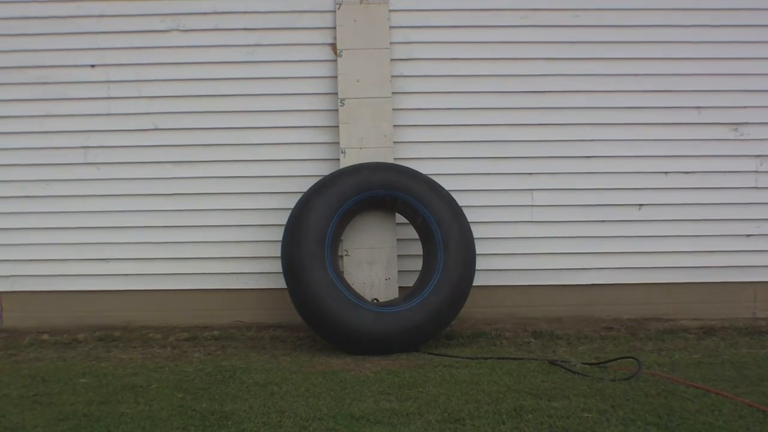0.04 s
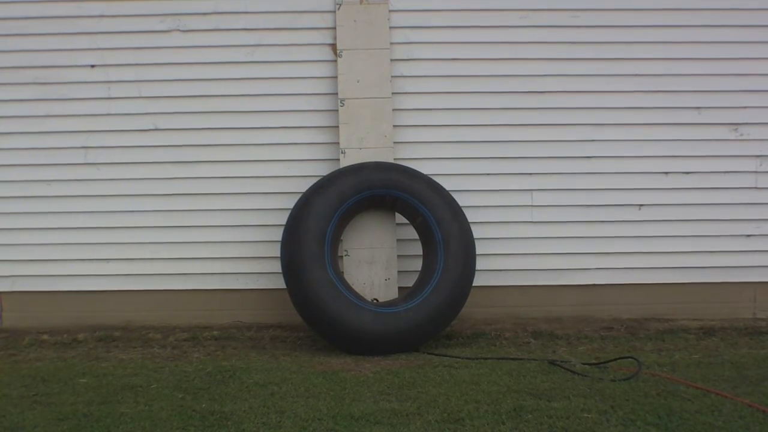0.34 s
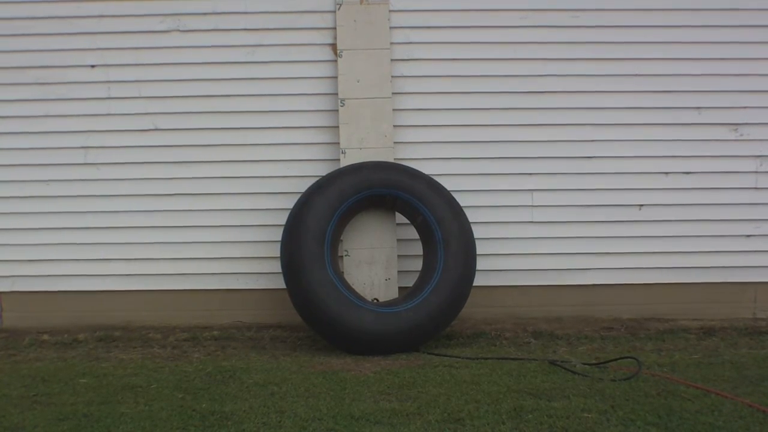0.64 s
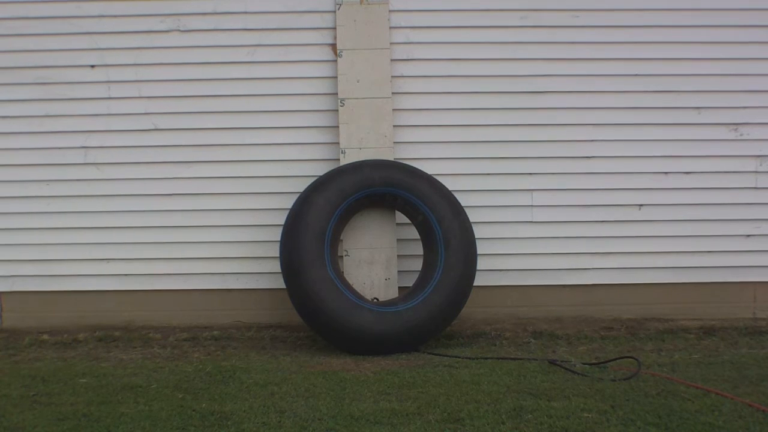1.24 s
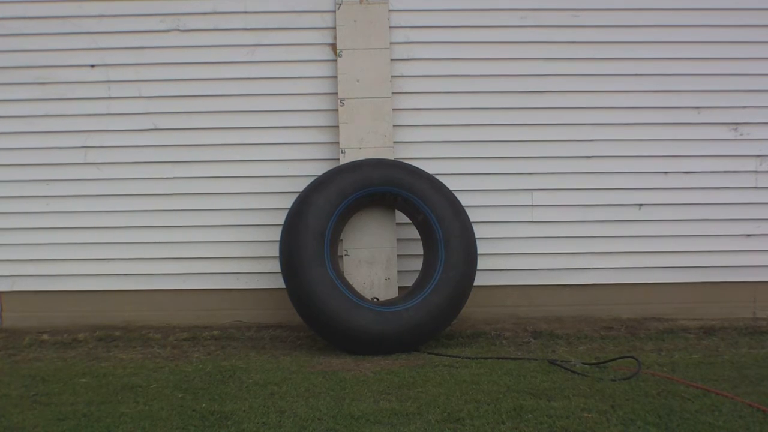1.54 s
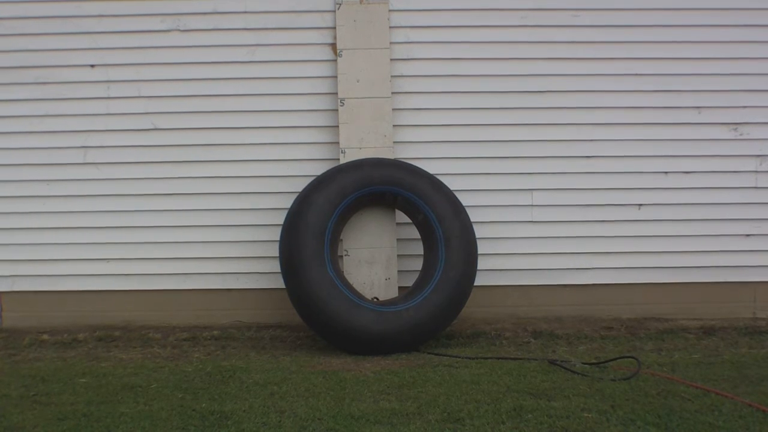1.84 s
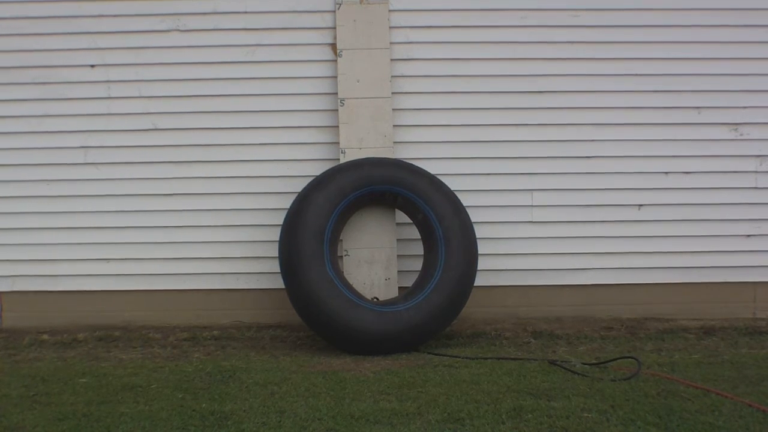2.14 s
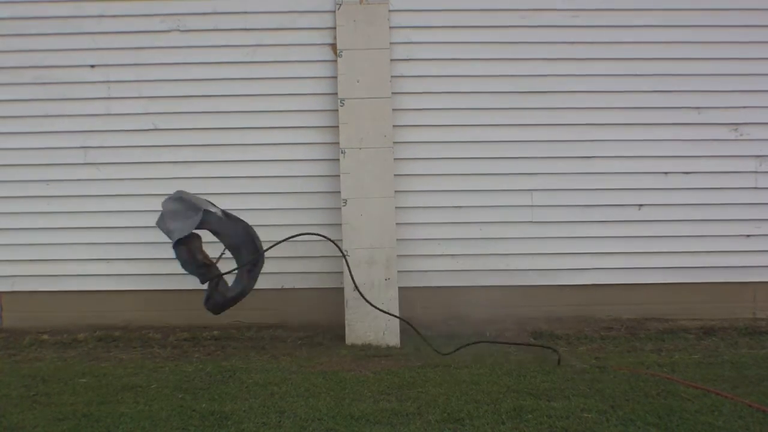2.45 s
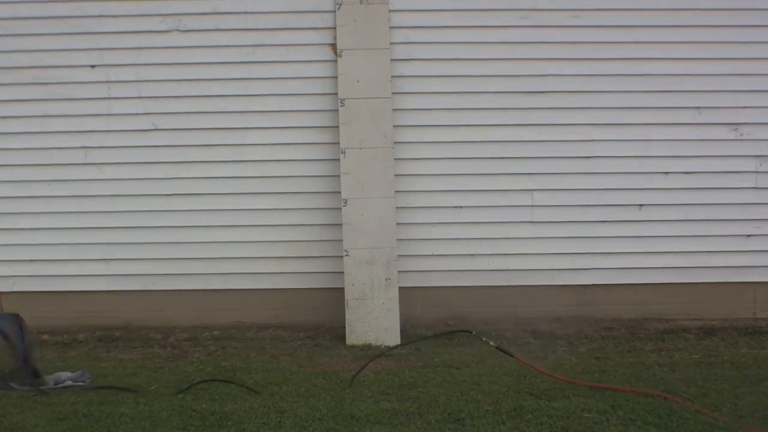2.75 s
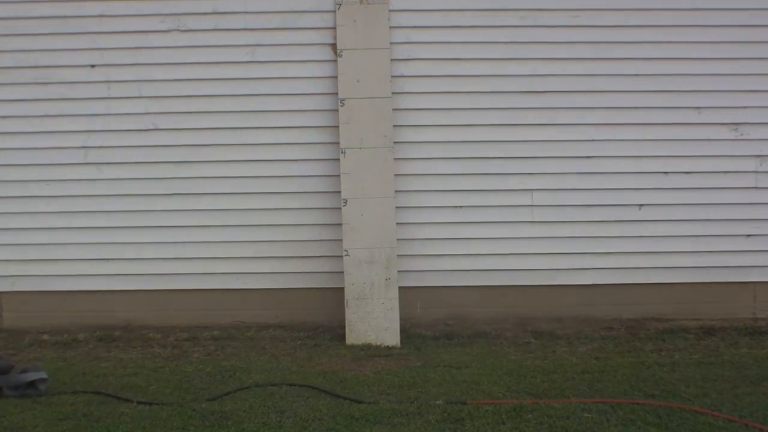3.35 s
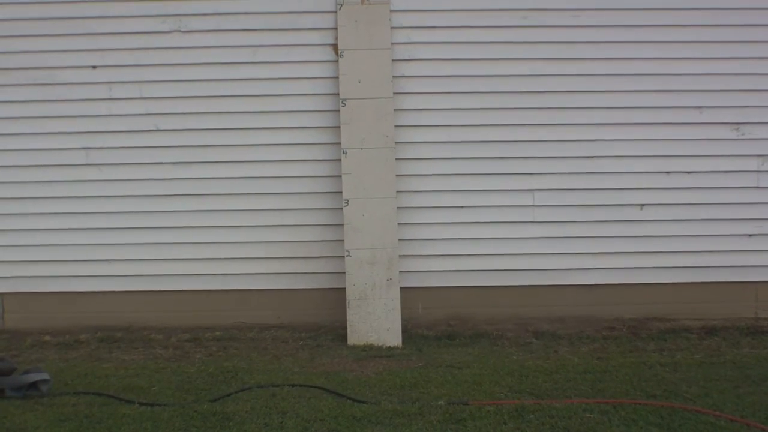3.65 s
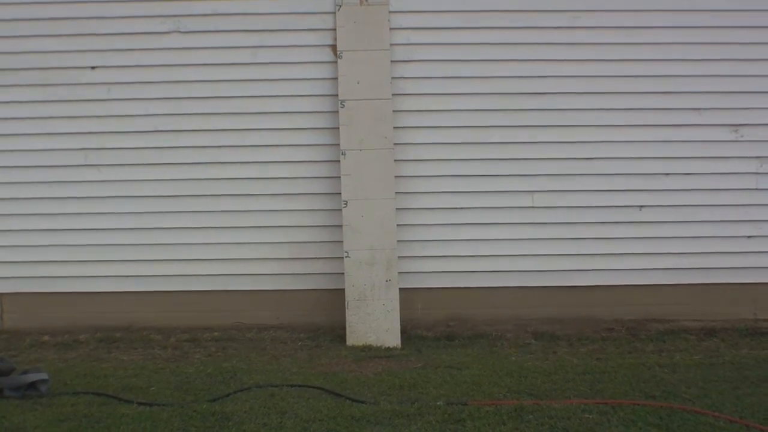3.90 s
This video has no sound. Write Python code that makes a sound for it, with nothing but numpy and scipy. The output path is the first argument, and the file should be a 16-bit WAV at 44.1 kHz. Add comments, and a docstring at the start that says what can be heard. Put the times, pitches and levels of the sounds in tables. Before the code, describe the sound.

Outdoors in a light breeze, compressed air hisses into a rubber inner tube until it explodes with a loud, distorted bang. The rubber flaps briefly, then the freed air hose whips around, ticks against the ground and lies hissing.

```python
"""Inner tube bursting in a yard

Compressed air hisses into a swollen inner tube leaning on a house wall, until the rubber bursts. The blast
overloads the recorder; the torn tube flaps away and the yard booms briefly. The freed hose whips about with a
swoosh, taps the ground, then lies hissing in the grass. A light wind rumbles underneath, and a quick fade ends
the scene."""
import sys
import numpy as np
from scipy import signal
from scipy.fft import rfft, irfft, next_fast_len
from scipy.io import wavfile
from scipy.ndimage import map_coordinates

SR = 44100
rng = np.random.default_rng(int(sys.argv[2]) if len(sys.argv) > 2 else 0)


def bounce(signal):
    """Save signal as a 16-bit WAV file at the path given by the first command-line argument."""
    frames = np.transpose(np.atleast_2d(signal))
    limited = np.clip(frames, -1, 1)
    pcm = np.round(limited * 32767).astype(np.int16)
    wavfile.write(sys.argv[1], SR, pcm)


N = 176400
BURST_S, HANDOVER_S = 2.3887, .02  # at the burst, the filling hiss crosses over to the open jet

# Breeze across the yard: time_s, relative_db
WIND_LEVEL = [(0, -39), (.2, -33), (.5, -38.5), (1.27, -35), (1.4, -30), (1.7, -32), (2.1, -28.5),
              (2.35, -30), (2.77, -45), (2.85, -37), (3.05, -39), (3.15, -45), (3.6, -43), (3.7, -36),
              (3.9, -37.5)]
# Spectrum of the wind's rumble: frequency_hz, relative_db
WIND_SPECTRUM = [(15, -7), (35, 0.5), (80, -2.5), (150, -5.5), (280, -13.5), (500, -26), (1500, -52)]

# Spectrum of the air entering the tube: frequency_hz, relative_db
FILL_SPECTRUM = [(150, -36.5), (330, -16), (430, -26.5), (520, -28.5), (800, -23.5), (1080, -31.5),
                 (1600, -22.5), (2000, -16.5), (2200, -20.5), (2450, -15), (3100, -15.5), (3700, -10),
                 (4300, -7.5), (4700, -5), (5200, -4), (5800, 0), (6800, -.5), (8000, -12), (9500, -20.5),
                 (11000, -29), (12000, -20), (14000, -17.5), (15500, -41.5)]
# Narrow resonances of valve and tube: pitch_hz, width_hz, level_db
VALVE_RESONANCES = [(2390, 100, -45), (2616, 65, -46), (2976, 54, -48), (3421, 36, -40), (4050, 90, -34.5),
                    (4600, 130, -35.5), (4720, 55, -39.5), (6380, 37, -35.5), (6780, 80, -33)]

# Hiss of the open hose: time_s, relative_db
JET_LEVEL = [(2.42, -23), (2.47, -25.5), (2.505, -18.5), (2.55, -19), (2.58, -22), (2.61, -19), (2.68, -16),
             (2.75, -21), (2.82, -17.5), (2.86, -20), (2.885, -23), (2.93, -23.5), (2.98, -21.5),
             (3.01, -21.5), (3.05, -18.5), (3.13, -21.5), (3.22, -20), (3.4, -20.5), (3.87, -20.5)]
# Spectrum of that hiss: frequency_hz, relative_db
JET_SPECTRUM = [(2000, -48.5), (3600, -12.5), (4600, -7), (5200, -4.5), (5900, -1), (6900, 0), (7400, -4.5),
                (8000, -11), (9200, -18), (11000, -29), (15000, -56.5)]
# The jet's lower roar: time_s, relative_db
ROAR_LEVEL = [(2.52, -30.5), (2.59, -38), (2.62, -25.5), (2.66, -22.5), (2.70, -32), (2.76, -35),
              (2.81, -28), (2.88, -33), (2.97, -31), (3.07, -26), (3.17, -27.5), (3.29, -32), (3.46, -25),
              (3.6, -29.5), (3.74, -30.5), (3.87, -29)]
# Spectrum of that roar: frequency_hz, relative_db
ROAR_SPECTRUM = [(100, -34), (350, -13.5), (600, -6), (850, 1.5), (1100, 3), (1700, 2), (2500, 2),
                 (3600, 0.5), (4600, 0), (6000, -8.5), (10000, -31.5)]
# Low body of the jet blowing into grass: frequency_hz, relative_db
GRASS_SPECTRUM = [(100, -17.5), (200, -10), (290, -1.5), (500, -3), (750, 2.5), (1000, -1), (1600, -25)]
# The jet's top sizzle: time_s, relative_db
SIZZLE_LEVEL = [(2.43, -40), (2.52, -35), (2.73, -37), (2.78, -30.5), (2.9, -35.5), (2.98, -31.5),
                (3.17, -32.5), (3.32, -27), (3.42, -31.5), (3.56, -28), (3.87, -28)]
# Spectrum of that sizzle: frequency_hz, relative_db
SIZZLE_SPECTRUM = [(6000, -35.5), (9000, -13.5), (10200, -9.5), (11000, -3), (11800, 1.5), (13200, -0.5),
                   (14000, -2), (15300, -6)]
# Lag of the roar's reflection as the nozzle moves: time_s, delay_ms
REFLECTION_LAG = [(2.5, 1.1), (2.65, .65), (2.74, 0.35), (2.86, 0.81), (3.05, .88), (3.35, 0.86),
                  (3.9, 0.94)]
# Resonances of the hose lying still: pitch_hz, width_hz, level_db
NOZZLE_RESONANCES = [(3350, 120, -35), (4600, 360, -26), (5970, 470, -22.5), (6620, 380, -23.5)]
# Half-whistling spurts of air: peak_s, sigma_s, pitch_hz, width_hz, level_db
AIR_SPURTS = [(.05, 0.045, 4760, 49.7, -24), (0.216, 0.03, 3410, 45, -25), (2.506, 0.013, 6300, 298, -19),
              (2.66, 0.027, 4350, 700, -26.5), (2.74, .03, 5400, 700, -19),
              (2.846, 0.012, 5840, 260, -17.5), (2.965, .02, 6850, 600, -20.5),
              (3.11, .035, 5130, 380, -21.5), (3.15, .035, 4520, 254, -25.5), (3.19, 0.024, 6840, 700, -18),
              (3.26, 0.023, 6280, 350, -22)]
# The jet sweeping past over the grass: time_s, level_db, centre_hz
SWOOSH_PATH = [(2.53, -49, 600), (2.58, -36, 700), (2.655, -31, 902), (2.69, -36, 1100),
               (2.728, -23.5, 1244), (2.755, -27, 1300), (2.80, -36, 1400), (2.88, -48, 1400)]
# The hose end striking the ground: peak_s, level_db
GROUND_TICKS = [(2.772, -6.5), (2.921, -15), (2.951, -13), (2.998, -17)]
# Spectrum of those ticks: frequency_hz, relative_db
TICK_SPECTRUM = [(400, -16), (1500, -6.5), (6000, -1.5), (9000, -11), (15000, -15)]

# Flaps of the torn rubber flying off: start_s, level_db, pitch_hz
RUBBER_FLAPS = [(2.441, -6, 135), (2.4602, -7.5, 118), (2.475, -10, 105), (2.4868, -4.5, 120),
                (2.506, -12.5, 130), (2.518, -18, 100), (2.538, -19, 110), (2.565, -19, 123.6),
                (2.582, -19, 140), (2.611, -20.5, 125), (2.632, -22, 100)]
# Spectrum of each flap's dull smack: frequency_hz, relative_db
SMACK_SPECTRUM = [(150, -4), (320, -2), (500, -15.5), (900, -13.5), (1300, -19.5), (3000, -22.5),
                  (9000, -44)]
# Spectrum of the rubber ripping open: frequency_hz, relative_db
RIP_SPECTRUM = [(100, -13.5), (250, -2), (380, 2.5), (500, -8.5), (750, -8), (980, -3.5), (1150, -9),
                (1350, 1.5), (1700, -10.5), (3000, -15), (6000, -9), (9000, -23.5), (15000, -31.5)]
# The yard's low boom: frequency_hz, relative_db
BOOM_SPECTRUM = [(25, 2), (70, -4), (110, -3.5), (170, -5.5), (290, -13), (500, -22), (1500, -62)]
# The yard's shorter slap: frequency_hz, relative_db
SLAP_SPECTRUM = [(100, -12), (350, 10.5), (600, -5.5), (950, 8.5), (1300, -20), (3000, -16.5), (9000, -27)]

# Likeness of rushing air at the two microphones: frequency_hz, coherence
AIR_COHERENCE = [(30, 0.95), (200, 0.97), (3500, .999), (5000, 0.91), (6800, 1), (8000, 0.88), (10200, .55),
                 (11500, .8), (15000, 1)]
# Likeness of the bang and impacts at the two microphones: frequency_hz, coherence
BANG_COHERENCE = [(100, .999), (1500, 0.97), (4000, 0.99), (8000, .8), (14000, 0.039)]
# Balance of the hiss across the pair: frequency_hz, left_minus_right_db
MIC_BALANCE = [(100, .1), (4000, 0), (5500, .5), (6700, 0), (8500, -2), (9900, -4.5), (11000, -2),
               (12200, -2), (13800, .5)]
# Phase of the hiss across the pair: frequency_hz, left_lead_rad
MIC_PHASE = [(100, 0), (3800, 0), (5000, .3), (7500, .36), (9300, .65), (10100, 1.5), (11500, 1.95),
             (13000, 2.15), (15000, 2.4)]


def amp(db):
    """Decibels to gain."""
    return 10 ** (np.asarray(db) / 20)


def clock():
    """Time of every sample in seconds."""
    return np.arange(N) / SR


def at_frequency(points, hz):
    """Read (frequency_hz, value) points on a log frequency axis."""
    knots_hz, values = np.transpose(points)
    return np.interp(np.log(hz + 1), np.log(knots_hz + 1), values)


def curve(rows, column=1):
    """One column of a timed table, interpolated to every sample."""
    columns = np.transpose(rows)
    return np.interp(clock(), columns[0], columns[column])


def wobble(rate_hz):
    """A smooth random curve with rate_hz knots a second."""
    return map_coordinates(rng.standard_normal(1024), [clock() * rate_hz], mode="wrap")


def ramp(start_s, rise_s):
    """A straight rise from 0 to 1."""
    return np.clip((clock() - start_s) / rise_s, 0, 1)


def puff(peak_s, rise_s, t60_s):
    """Envelope that swells up to peak_s and then dies away."""
    t = clock() - peak_s
    return np.exp(np.minimum(t, 0) / rise_s - np.log(1000) * np.maximum(t, 0) / t60_s)


def filtered(x, response):
    """Pass x through a gain given as a function of frequency."""
    size = next_fast_len(N + SR // 2)
    return irfft(rfft(x, size) * response(np.fft.rfftfreq(size, 1 / SR)), size)[..., :N]


def rush(spectrum, coherence):
    """Stereo turbulence noise whose mid signal has rms 1."""
    def mid_side_gains(hz):
        spread_rad = np.arccos(np.clip(at_frequency(coherence, hz), -.95, 1)) / 2
        return amp(at_frequency(spectrum, hz)) * np.array([np.ones_like(hz), np.tan(spread_rad)])

    mid, side = filtered(rng.standard_normal((2, N)), mid_side_gains)
    return np.array([mid + side, mid - side]) / np.std(mid)


def band(centre_hz, width_hz):
    """A band of noise of rms 1 round a steady or moving centre."""
    a, b = filtered(rng.standard_normal((2, N)), lambda hz: 1 / (1 + (2 * hz / width_hz) ** 2))
    phase = 2 * np.pi * np.cumsum(centre_hz * np.ones(N)) / SR
    noise = a * np.cos(phase) + b * np.sin(phase)
    return noise / np.sqrt(np.mean(noise ** 2) + 1e-20)


def ringing(resonances):
    """Resonances blown by turbulent air."""
    return sum(amp(db) * band(hz, width_hz) for hz, width_hz, db in resonances)


def wind(trim_db=-.5):
    """A light breeze lays a low, lumpy rumble under the yard."""
    return amp(curve(WIND_LEVEL) + trim_db + wobble(10)) * rush(WIND_SPECTRUM, AIR_COHERENCE)


def wall_scatter(air, level_db=-12, t60_s=.09):
    """The siding of the house wall, right by the tube, adds dense, short reflections."""
    t = np.arange(SR // 16) / SR
    tail = rng.standard_normal(len(t)) * np.exp(-np.log(1000) * t / t60_s)
    tail /= np.linalg.norm(tail)
    return air + amp(level_db) * signal.fftconvolve(air, tail[None], axes=1)[:, :N]


def microphone_pair(hz):
    """Left and right responses: the two microphones differ in level and phase."""
    half = np.array([[.5], [-.5]])
    return amp(half * at_frequency(MIC_BALANCE, hz)) * np.exp(1j * half * at_frequency(MIC_PHASE, hz))


def filling(hiss_db=-15.5, waver_db=.3):
    """Air hisses steadily through the valve and rings its resonances, until the burst."""
    hiss = amp(hiss_db) * rush(FILL_SPECTRUM, AIR_COHERENCE) + ringing(VALVE_RESONANCES)
    return amp(waver_db * wobble(14)) * hiss * (1 - ramp(BURST_S, HANDOVER_S))


def hose_jet(hiss_db=2, roar_db=2.5, grass_db=-4, sizzle_db=7, settled_db=-2.5, reflection_gain=.4):
    """The open jet swings about, its roar combed by a shifting reflection, then settles and rings."""
    settled = ramp(2.93, rise_s=.57)
    in_grass = ramp(2.84, rise_s=.21)
    hiss_gain = amp(curve(JET_LEVEL) + hiss_db + settled_db * settled + .5 * wobble(35))
    hiss = hiss_gain * rush(JET_SPECTRUM, AIR_COHERENCE)
    roar = amp(curve(ROAR_LEVEL) + roar_db + .5 * wobble(25)) * rush(ROAR_SPECTRUM, AIR_COHERENCE)
    roar += amp(curve(ROAR_LEVEL) + grass_db) * in_grass * rush(GRASS_SPECTRUM, AIR_COHERENCE)
    sizzle = amp(curve(SIZZLE_LEVEL) + sizzle_db) * rush(SIZZLE_SPECTRUM, AIR_COHERENCE)
    earlier = np.arange(N) - curve(REFLECTION_LAG) * SR / 1000
    reflection = np.array([map_coordinates(channel, [earlier]) for channel in roar])
    jet = hiss + roar - reflection_gain * reflection + sizzle
    return jet * ramp(BURST_S, HANDOVER_S) + settled * ringing(NOZZLE_RESONANCES)


def spurts():
    """The rushing air catches a pitch for a moment."""
    return sum(amp(db) * np.exp(-.5 * ((clock() - peak_s) / sigma_s) ** 2) * band(hz, width_hz)
               for peak_s, sigma_s, hz, width_hz, db in AIR_SPURTS)


def swoosh(upper_ratio=1.7, upper_db=2.5):
    """Two bands of turbulence rise in pitch as the hose whips past the microphones."""
    level_db, centre_hz = curve(SWOOSH_PATH), curve(SWOOSH_PATH, column=2)
    gate = ramp(SWOOSH_PATH[0][0], .023) * (1 - ramp(SWOOSH_PATH[-1][0], .05))
    upper = amp(upper_db) * band(upper_ratio * centre_hz, width_hz=1400)
    lower = band(centre_hz, width_hz=480)
    return gate * amp(level_db) * (lower + upper)


def hose_ticks():
    """The whipping hose end strikes the ground with sharp ticks."""
    strikes = sum(amp(db) * puff(peak_s, rise_s=.00026, t60_s=.008) for peak_s, db in GROUND_TICKS)
    return strikes * rush(TICK_SPECTRUM, BANG_COHERENCE)


def flapping(rise_s=.0032, smack_db=-12):
    """The slack rubber flies off with soft, low thumps, each with a dull smack."""
    thumps, smack_envelope = np.zeros(N), np.zeros(N)
    for start_s, db, hz in RUBBER_FLAPS:
        t = np.maximum(clock() - start_s, 0)
        thumps -= amp(db) * t / rise_s * np.exp(1 - t / rise_s) * np.sin(2 * np.pi * hz * t)
        smack_envelope += amp(db + smack_db) * puff(start_s, rise_s, t60_s=.064)
    return thumps + smack_envelope * rush(SMACK_SPECTRUM, BANG_COHERENCE)


def burst(blast_db=31, blast_s=.0026, cavity_db=30, cavity_hz=123, cavity_t60_s=.031):
    """A pressure pulse escapes, the air in the tube swings, the rubber rips and the yard answers."""
    t = np.maximum(clock() - BURST_S, 0)
    blast = -amp(blast_db) * (1 - t / blast_s) * np.exp(-t / blast_s)
    since_blast = np.maximum(t - blast_s, 0)
    cavity_decay = np.exp(-np.log(1000) * since_blast / cavity_t60_s)
    cavity = amp(cavity_db) * np.sin(2 * np.pi * cavity_hz * since_blast) * cavity_decay
    torn_s, rise_s = BURST_S + .012, .0025
    rip = amp(4.5) * puff(torn_s, rise_s, t60_s=.064) * rush(RIP_SPECTRUM, BANG_COHERENCE)
    boom = amp(-14.5) * puff(torn_s, rise_s, t60_s=.62) * rush(BOOM_SPECTRUM, BANG_COHERENCE)
    slap = amp(-21.5) * puff(torn_s, rise_s, t60_s=.44) * rush(SLAP_SPECTRUM, BANG_COHERENCE)
    return (t > 0) * (blast + cavity + rip + boom + slap)


def scene():
    """The yard as heard from the microphone pair."""
    air = wall_scatter(filling() + hose_jet() + spurts() + swoosh())
    return filtered(air, microphone_pair) + burst() + flapping() + hose_ticks() + wind()


def record(dry):
    """The recorder clips hard on the blast and keeps nothing above its band limit; the sound then fades out
    quickly."""
    ceiling, band_limit_hz = .97, 15550
    clipped = np.clip(dry, -ceiling, ceiling)
    fade_out = np.sqrt(1 - ramp(3.875, .042))
    return filtered(clipped * fade_out, lambda hz: hz < band_limit_hz)


dry = scene()
out = record(dry)
bounce(out)
```